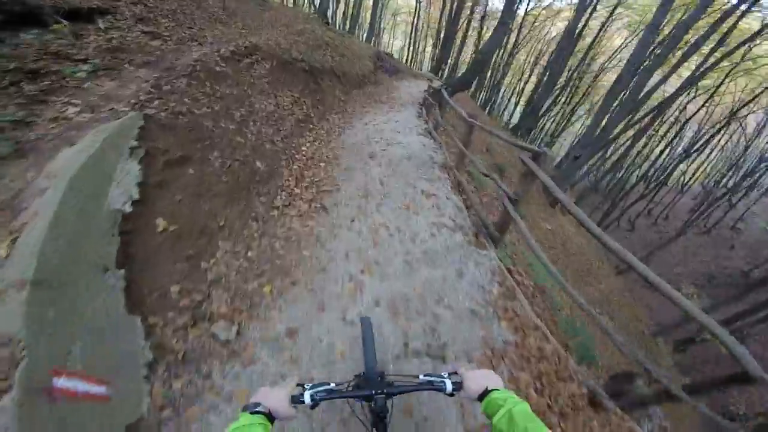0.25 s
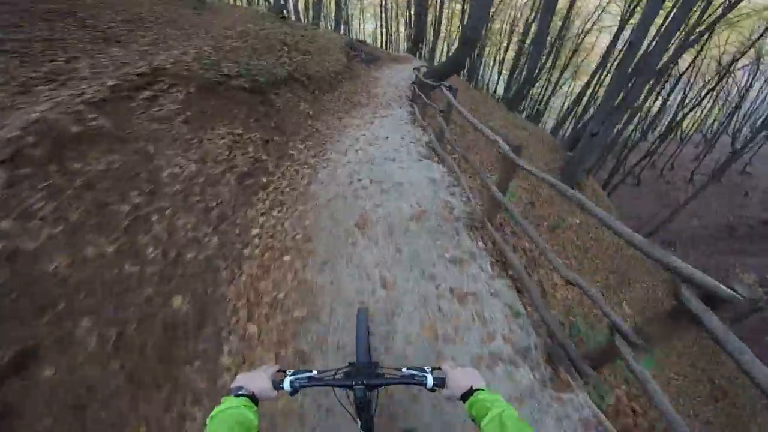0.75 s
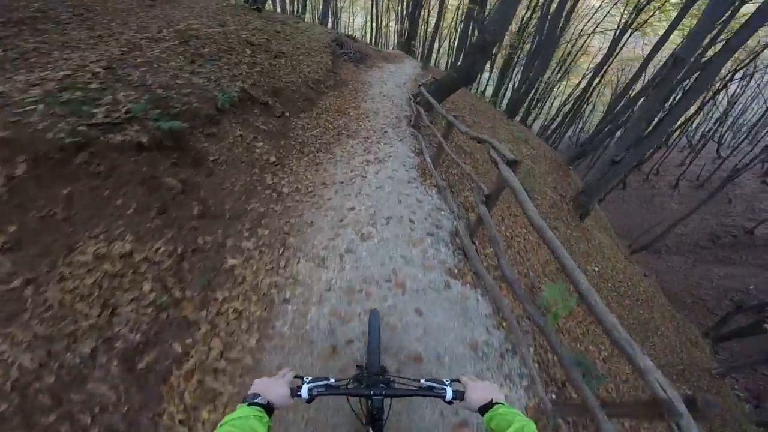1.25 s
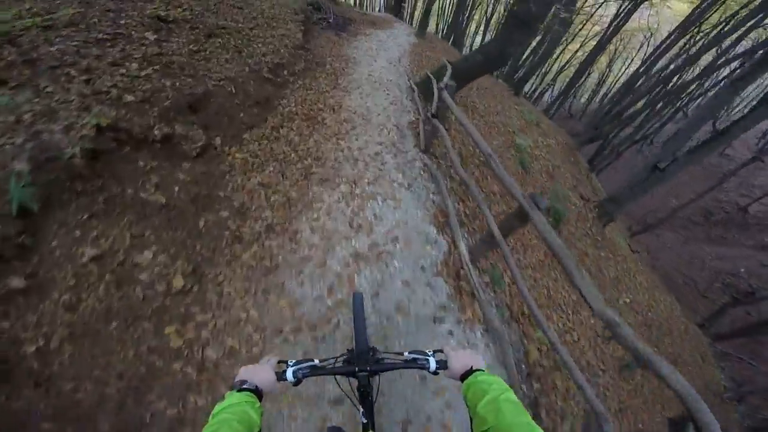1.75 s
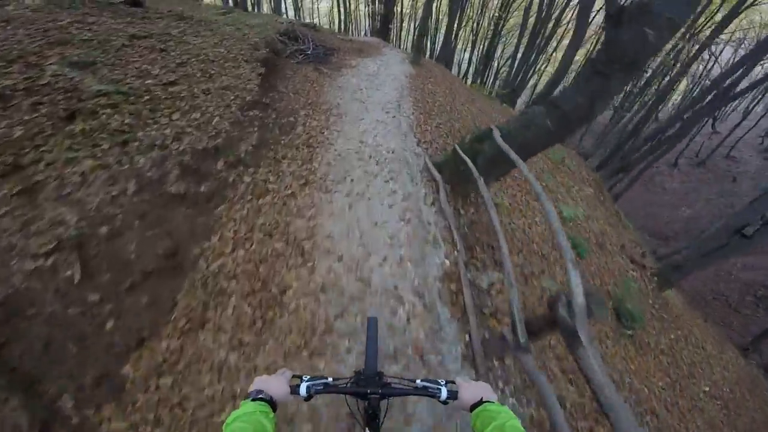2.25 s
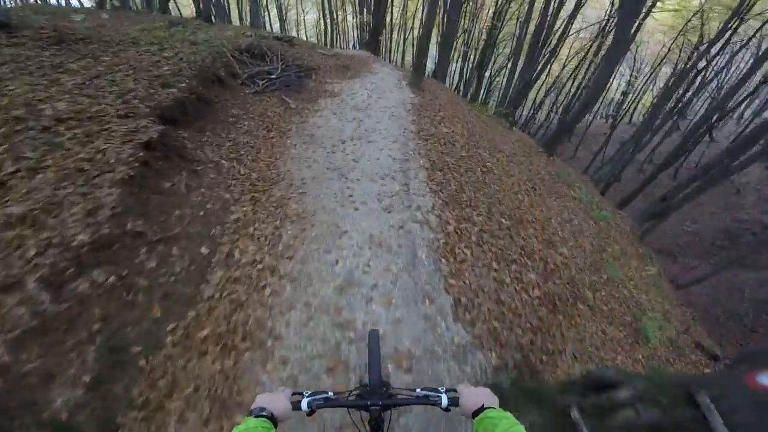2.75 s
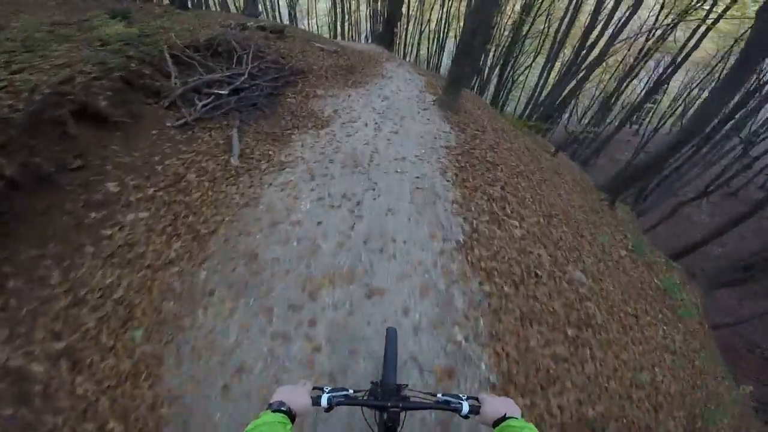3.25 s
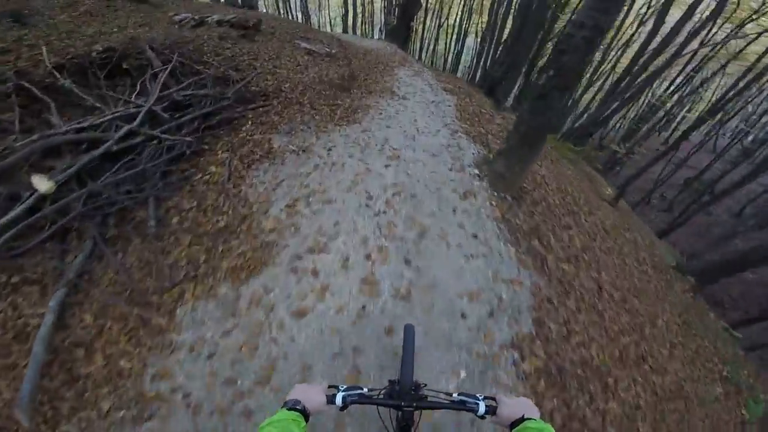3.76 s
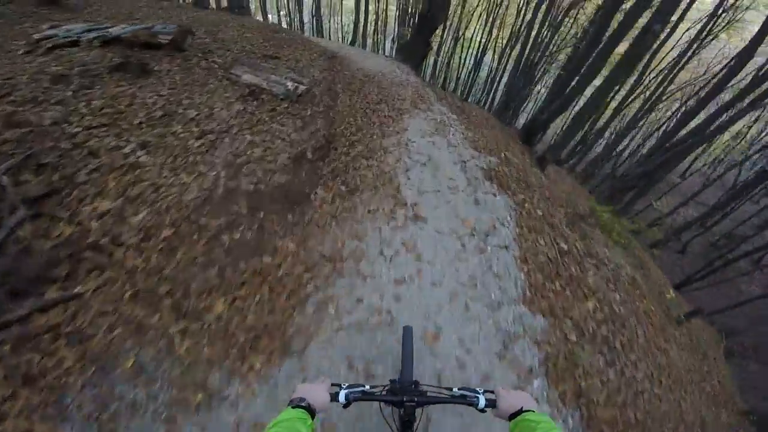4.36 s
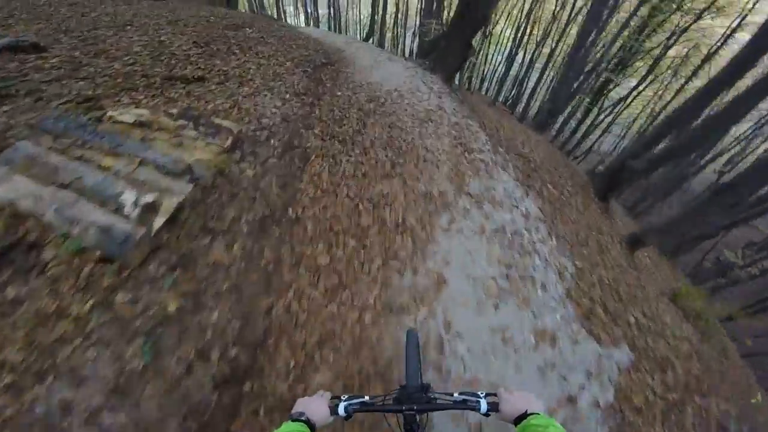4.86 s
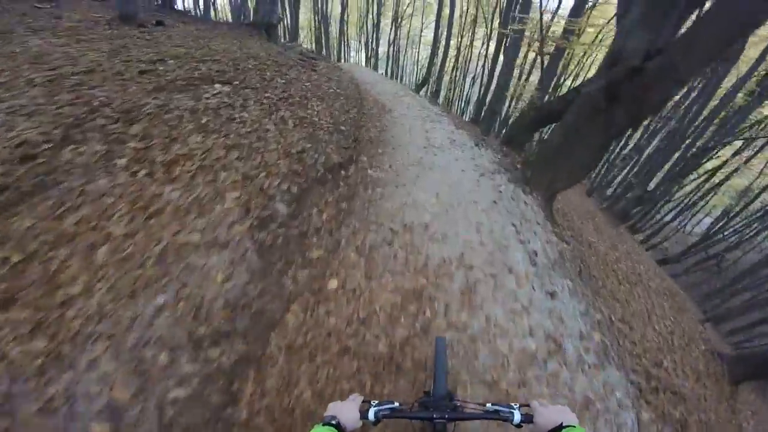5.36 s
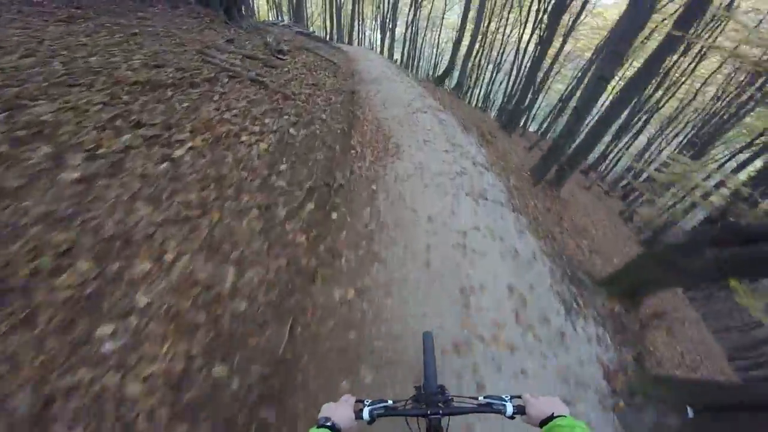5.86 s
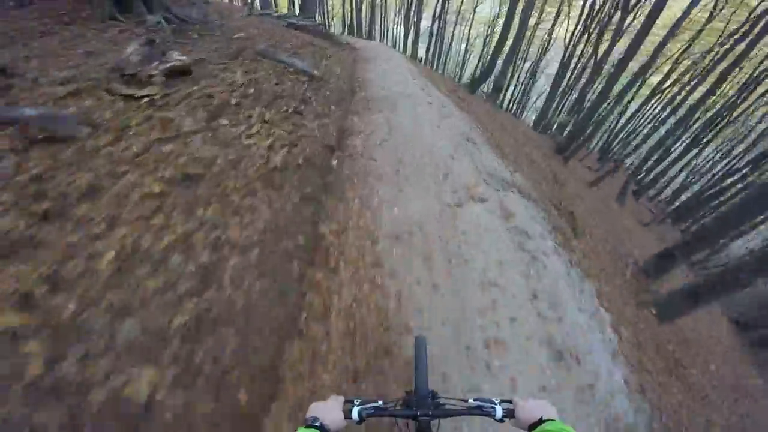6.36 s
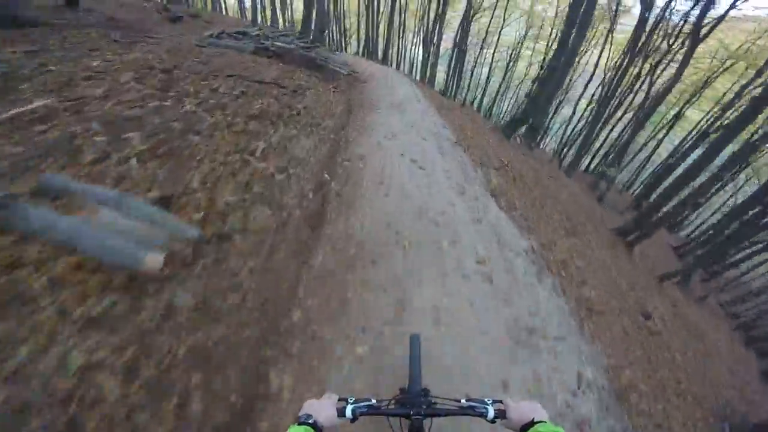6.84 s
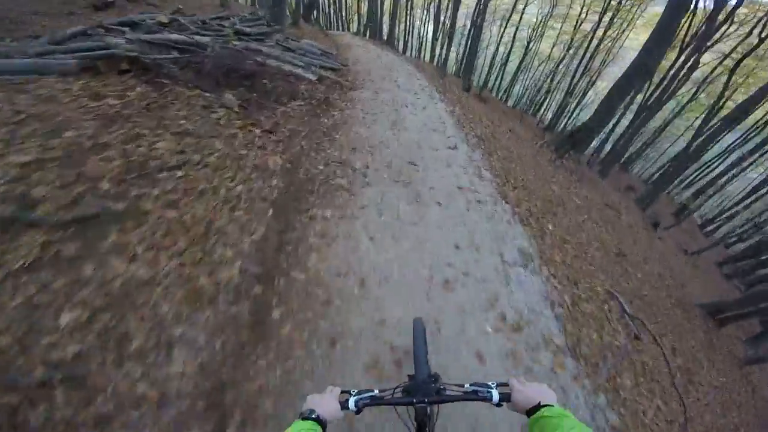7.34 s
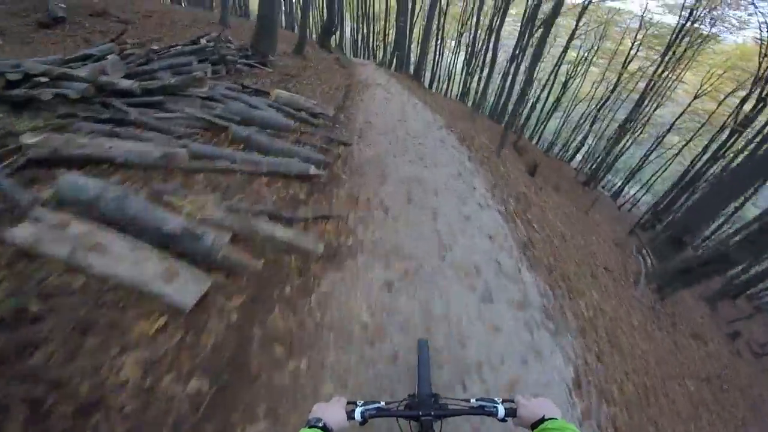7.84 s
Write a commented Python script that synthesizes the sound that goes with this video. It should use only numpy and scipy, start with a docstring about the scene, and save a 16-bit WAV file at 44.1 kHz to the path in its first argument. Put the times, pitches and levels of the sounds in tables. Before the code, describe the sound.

Close, from the rider's position, bicycle tyres crunch steadily over gravel and scattered dry leaves on a woodland path. Pebbles click and snap at irregular moments and the bike gives short rattles on bumps. The crunching grows louder and denser, then swells into a brief hiss of deep leaves. Wind rumbles against the microphone in ever stronger gusts, dominating the last seconds with low thumps while the tyres keep crackling.

```python
"""Mountain bike on a forest trail

Camera microphone on the rider's chest, about a metre above the tyres, as the bike gathers speed.
The tyres grind over grit, crush dry leaves and flick small stones; around 5 s they run through a leaf
drift. Bumps rattle the frame. Wind buffets the microphone ever harder, and the camera's case colours
the crackle."""
import sys
import numpy as np
from scipy import signal
from scipy.fft import rfft, irfft
from scipy.io import wavfile
from scipy.ndimage import map_coordinates

SR = 44100
rng = np.random.default_rng(int(sys.argv[2]) if len(sys.argv) > 2 else 0)


def digitize_waveform(pressure):
    """Quantize a signal to 16-bit integers and store it at the path in sys.argv[1].

    Rows of a 2-D input are taken as channels; values are limited to [-1, 1].
    """
    field = np.atleast_2d(pressure).T
    bounded = np.clip(field, -1, 1)
    quanta = np.round(bounded * 32767).astype(np.int16)
    wavfile.write(sys.argv[1], SR, quanta)


N = 357210

# gravel under the tyres along the trail: t/s, level/dB
GRAVEL = [(0.0, -50), (1.0, -47), (1.8, -45), (2.8, -43), (3.1, -39), (3.35, -38.5), (3.63, -36.5),
          (3.92, -40), (4.3, -43), (4.72, -36), (5.0, -36.5), (5.35, -34), (5.88, -43.5), (6.55, -38.5),
          (7.1, -42.5), (8.1, -40)]
# spectra of the drumming tread, the grinding grit and small eddies of air: f/Hz, level/dB
TREAD_SPECTRUM = [(30, -41), (150, -6.5), (240, -7), (315, 14), (400, -8), (520, 6), (590, 1), (668, -3.5),
                  (780, 5), (1000, -7.5), (1600, -29.5), (8000, -100)]
GRIT_SPECTRUM = [(60, -55), (300, -16), (700, -0.5), (1000, -2), (1400, 1), (2000, 4.5), (2900, -3),
                 (3700, -7), (5000, -22.5), (8000, -29.5), (12000, -34.5), (16000, -56)]
EDDY_SPECTRUM = [(70, -22.5), (150, -1), (220, -0.5), (320, -4), (450, -8.5), (650, -16), (800, -24.5),
                 (1000, -31.5), (1600, -40.5), (4000, -96), (10000, -120)]
MERGE_DB_PER_S = 1  # small patches and stones sink into the rush as the bike speeds up


def rolling():
    """The tread drums on the ground and grinds the trail: more contacts are both louder and denser."""
    # the tyres go light behind a rise in the path: t/s, length/s, loss/dB
    lifts = [(0.35, .08, 1), (0.52, 0.057, 2.5), (1.22, 0.11, 3.5), (1.49, 0.065, 6), (3.325, 0.07, 7.5),
             (3.735, 0.036, 6), (3.89, 0.17, 2), (4.2, 0.091, 1.5), (7.225, 0.15, 3.5), (8.08, 0.17, 2.5)]
    # spectra of rustling leaves and of their finest fragments: f/Hz, level/dB
    leaf_spectrum = [(200, -59), (1000, -15), (2500, -0.5), (3700, -1), (4800, -1), (5800, -3), (7000, -4),
                     (8500, -8.5), (10000, -15), (12500, -25), (14500, -28.5), (16000, -42)]
    sizzle_spectrum = [(2000, -25), (6000, 3), (9500, -4), (12500, -7), (15000, -13)]
    t = np.arange(N) / SR
    lift_db, drift_db = humps(lifts), leaf_drifts()
    grit_db = curve(GRAVEL) - lift_db
    leaves_db = leaf_litter(t) + drift_db - lift_db / 2
    uneven = amp(-0.12 * (t - 3.0) - 0.3 * drift_db)  # the roll evens out with speed and in deep leaves
    bumps = uneven * wobble(40)  # both tyres press harder on every bump
    cushion_db = 0.22 * drift_db
    tread = noise(TREAD_SPECTRUM) * amp(-44.5 + 0.93 * (grit_db + 43.5) - cushion_db + 0.56 * bumps)
    grit = crackle(GRIT_SPECTRUM, 800 * amp(grit_db + 43.5) / uneven ** 2, spread_db=8.0, blur=0.75)
    grit *= amp(grit_db - 2.0 + 1.6 * bumps)
    leaves = crackle(leaf_spectrum, 1700 * amp(leaves_db + 55.5), spread_db=0.5, blur=1.0)
    patchy = amp(-0.45 * (leaves_db + 48))  # a deep drift evens out the rustle of single leaves
    flutter_db = 0.35 * bumps + 2.65 * np.minimum(uneven, 1) * wobble(90)
    leaves *= amp(leaves_db - 3.5 + patchy * flutter_db)
    # pebbles and stalks keep nearly the same size, so they sink into the rush as it grows
    pebbles = ticks(2360, octaves=0.48, size_db=6, count=1000)
    pebbles *= amp(-50.5 + 0.68 * (grit_db + 36.5) + 2.5 * bumps)
    stalks = ticks(5230, octaves=0.8, size_db=18, count=900) * amp(-62.5 + (leaves_db + 49) / 2)
    # brittle leaf edges break one by one, each at its own high pitch
    flakes = ticks(7600, octaves=0.6, size_db=22, count=800) * amp(-65.5 + 0.53 * (leaves_db + 48))
    sizzle = amp(-68.5) * noise(sizzle_spectrum)
    return tread + grit + pebbles + leaves + stalks + flakes + sizzle


def leaf_litter(t):
    """Level in dB of scattered leaves, which rustle louder as the bike gains speed."""
    return -58 + 0.73 * t


def leaf_drifts(edge_share=0.17):
    """The dB that drifts add to the scattered leaves; each deepens, holds and thins out."""
    # drifts that the tyres plough through: t in/s, t out/s, gain/dB
    drift_spans = [(1.712, 3.758, 3.5), (4.714, 4.832, 10), (4.929, 5.79, 15), (6.403, 6.84, 6),
                   (7.82, 7.986, 7)]
    t = np.arange(N) / SR
    drift_db = np.zeros(N)
    for enter, leave, db in drift_spans:
        edge_s = edge_share * (leave - enter)
        drift_db += db * (np.tanh((t - enter) / edge_s) - np.tanh((t - leave) / edge_s)) / 2
    return drift_db


def crunches(rise_share=0.18):
    """A patch of grit and leaves gives way quickly and crumbles out, with a dull bump from the tyre."""
    # the biggest patches crushed at once: t/s, length/s, grit level/dB, leaf level/dB
    big_patches = [(0.1, 0.038, -52, -63), (0.399, 0.014, -37.5, -60), (0.451, 0.012, -40.5, -62),
                   (.49, 0.0097, -47, -69), (0.66, 0.041, -43, -58), (0.747, 0.021, -49, -54),
                   (0.778, 0.027, -39.5, -69), (0.983, 0.018, -41, -55), (1.087, 0.029, -44, -59),
                   (1.362, 0.016, -45, -60), (1.475, 0.0072, -50, -60), (1.548, 0.018, -38, -76),
                   (1.717, 0.014, -43, -58), (1.74, 0.014, -54, -52), (1.78, 0.029, -53, -55),
                   (1.823, 0.02, -37.5, -53), (1.878, 0.018, -42, -55), (2.061, 0.025, -38, -49.5),
                   (2.13, 0.015, -36, -50), (2.177, 0.032, -42, -53.5), (2.26, 0.0065, -40, -43.5),
                   (2.313, 0.024, -36.5, -49.5), (2.354, 0.022, -39, -52.5), (2.421, 0.022, -38, -49.5),
                   (2.525, 0.049, -47, -58), (2.569, 0.0085, -33.5, -53), (2.71, 0.022, -35, -57),
                   (2.758, .016, -38, -68), (2.793, .012, -36, -68), (2.87, 0.011, -36, -55),
                   (2.956, 0.016, -38, -58), (2.996, 0.024, -34.5, -68), (3.042, 0.028, -43, -49.5),
                   (3.099, 0.027, -37, -61), (3.125, 0.014, -36, -51), (3.151, 0.01, -33, -53),
                   (3.263, 0.013, -36, -62), (3.291, 0.02, -38, -59), (3.403, 0.025, -36, -52.5),
                   (3.452, 0.024, -31.5, -51.5), (3.548, 0.028, -37, -61), (3.667, .014, -50, -54),
                   (3.693, .016, -40, -57), (3.78, 0.033, -33.5, -55), (3.84, 0.02, -36, -52),
                   (3.985, 0.049, -42, -64), (4.064, 0.016, -42, -48.5), (4.09, 0.028, -34, -69),
                   (4.283, 0.065, -41, -56), (4.396, 0.014, -39, -52), (4.517, 0.014, -33.5, -56),
                   (4.809, 0.027, -37, -49.5), (4.912, .008, -43, -49), (4.93, 0.012, -32.5, -51),
                   (4.956, 0.012, -49, -57), (5.022, 0.017, -50, -47.5), (5.065, 0.013, -45, -44.5),
                   (5.183, 0.058, -60, -47.5), (5.554, .014, -36, -47), (5.613, .04, -43, -48),
                   (5.646, 0.013, -40, -47), (6.469, 0.025, -35, -47.5), (6.503, 0.019, -31, -45.5),
                   (6.535, 0.0087, -35.5, -46), (6.67, 0.018, -50, -51.5), (7.067, 0.01, -44, -57.5),
                   (7.161, 0.01, -33.5, -62), (7.45, 0.015, -45.5, -58)]
    # spectrum of crushed leaves: f/Hz, level/dB
    crush_spectrum = [(200, -56), (1000, -15), (2500, -6), (3700, -2), (4800, 0.5), (5800, -2),
                      (7000, -2.5), (8500, -6), (10000, -14), (12500, -23), (14500, -29), (16000, -38)]
    t = np.arange(N) / SR
    grit_power, leaf_power = np.zeros(N), np.zeros(N)
    for s, length, grit_db, leaves_db in big_patches + small_patches():
        near = slice(max(int((s - 0.1) * SR), 0), int((s + 0.15) * SR))
        age = np.maximum((t[near] - s) / (length * rise_share) + 2.5, 0) / 2
        grit_power[near] += amp(grit_db) ** 2 * swell(age)
        leaf_power[near] += amp(leaves_db) ** 2 * swell(age)
    grit = amp(-3.0) * crackle(GRIT_SPECTRUM, 1500, spread_db=4.5, blur=0.6)
    bump = amp(-5.5) * noise(TREAD_SPECTRUM)
    pebbles = amp(-3.0) * ticks(2155, octaves=0.59, size_db=6.5, count=5000)
    leaves = amp(6.5) * crackle(crush_spectrum, 2500, spread_db=8.5, blur=0.44)
    return np.sqrt(grit_power) * (grit + bump + pebbles) + np.sqrt(leaf_power) * leaves


def small_patches(count=60, length_s=0.0097, spread_db=1):
    """Random rows for crunches(), as strong as the trail is gritty and leafy there."""
    s = scattered_times(count)
    grit_offset, leaf_offset = spread_db * rng.standard_normal((count, 2)).T - MERGE_DB_PER_S * s
    grit_db = np.interp(s, *np.transpose(GRAVEL)) + 5.5 + grit_offset
    leaves_db = leaf_litter(s) - 5.5 + leaf_offset
    return list(zip(s, np.full(count, length_s), grit_db, leaves_db))


def stones(crack_hz=5200, knock_hz=884, scatter_t60=0.086):
    """A pinched stone cracks free with a pop of a few cycles, knocks the tyre and scatters some grit."""
    # the loudest stones: t/s, snap level/dB, snap f/Hz, knock level/dB
    big_stones = [(0.095, -35, 2720, -38), (0.0973, -23.5, 2500, -40), (0.1155, -26, 2840, -29),
                  (0.1641, -26, 2600, -38), (0.1924, -31.5, 5020, -50), (0.2385, -46, 2050, -34),
                  (0.4036, -28, 2890, -43), (0.4462, -32, 1700, -32), (0.4508, -33, 2400, -40),
                  (0.7135, -26.5, 2150, -40), (0.7974, -25, 2600, -37), (0.9784, -19.5, 2100, -28),
                  (1.03, -29, 1740, -28), (1.1228, -23, 2700, -35), (1.161, -29.5, 2880, -48),
                  (1.273, -36, 2040, -40), (1.326, -24, 1760, -34), (1.3785, -31, 2780, -43),
                  (1.4035, -26, 2450, -40), (1.4316, -32, 2430, -44), (1.4503, -30, 1900, -45),
                  (1.5045, -28, 2780, -40), (1.538, -33, 2240, -47), (1.557, -26, 1900, -42),
                  (1.653, -23, 2480, -27), (1.7066, -31, 4170, -45), (1.7085, -29.5, 4600, -48),
                  (1.7447, -36, 4830, -50), (1.786, -33, 2260, -42), (1.8272, -29, 4520, -45),
                  (1.888, -16, 2130, -21), (1.9355, -25, 2050, -37), (1.965, -30, 1780, -34),
                  (2.0086, -25.5, 1580, -26), (2.1791, -18, 1860, -26), (2.611, -19.5, 2160, -36),
                  (2.7091, -18, 2000, -27), (2.8714, -18, 1990, -25), (3.044, -16.5, 2200, -28),
                  (3.2115, -21, 1910, -37), (3.4076, -14, 1900, -30), (3.4605, -23, 1900, -19),
                  (3.5112, -24, 1900, -21), (3.577, -26, 1700, -21), (3.6275, -22, 1850, -29),
                  (3.6325, -23, 2300, -28), (3.7852, -17.5, 2110, -32), (3.8010, -17, 1810, -15),
                  (4.013, -20, 2230, -27), (4.089, -20, 2200, -25), (4.1035, -22, 1800, -30),
                  (4.144, -24, 2130, -33), (4.272, -19.5, 2060, -22), (4.4342, -11, 2130, -29),
                  (4.6358, -14, 2150, -25), (4.935, -18.5, 1860, -27), (4.985, -22.5, 2400, -34),
                  (5.06, -17.5, 2080, -30), (5.404, -21, 1900, -21), (5.428, -25, 2290, -34),
                  (5.7595, -24, 1880, -30), (5.974, -25.5, 2720, -37), (6.253, -24.5, 1800, -24),
                  (6.298, -27, 1800, -23), (6.4592, -19, 1790, -26), (6.658, -27, 1910, -24),
                  (7.267, -30, 2000, -28), (7.3355, -17.5, 2640, -32), (7.467, -19, 2130, -21)]
    t = np.arange(SR // 20) / SR
    pops, scatter = np.zeros(N), np.zeros(N)
    for s, db, hz, knock_db in big_stones + small_stones():
        ring, hollow, brittle = rng.standard_normal(3)
        snap = amp(db + 1.8) * pop(t, hz, rise_cycles=0.86 * np.exp(0.18 * ring))
        crack_db = -37 + 0.28 * (db + 15.5) + 3 * brittle
        crack = amp(crack_db) * pop(t, crack_hz, rise_cycles=0.56)
        knock = amp(knock_db) * pop(t, knock_hz * 2 ** (0.28 * hollow), rise_cycles=0.53)
        add_at(pops, s, crack + snap + knock)
        add_at(scatter, s, amp(db - 26 - 60 * t / scatter_t60))
    return pops + scatter * noise(GRIT_SPECTRUM)


def small_stones(count=32, spread_db=2, centre_hz=2160, octaves=0.32, knock_db=-9):
    """Random rows for stones(), stronger where the trail is grittier."""
    s = scattered_times(count)
    size, pitch = rng.standard_normal((count, 2)).T
    db = np.interp(s, *np.transpose(GRAVEL)) + 16.5 + spread_db * size - MERGE_DB_PER_S * s
    return list(zip(s, db, centre_hz * 2 ** (octaves * pitch), db + knock_db))


def frame_rattle(chatter_s=0.0143, contacts=4, rise_s=0.00027):
    """Each bump shakes loose parts into a few quick, ever weaker contacts, which ring the frame."""
    # bumps that rattle the bike: t/s, level/dB
    jolts = [(0.1, -46), (0.449, -50), (1.12, -39), (1.155, -44), (1.283, -40.5), (1.888, -41.5),
             (2.1, -37), (2.527, -40.5), (3.043, -38), (3.171, -32.5), (3.406, -30.5), (3.449, -32),
             (3.547, -41), (3.8, -30), (4.014, -33), (4.082, -34), (4.1, -34), (6.459, -27.5), (6.657, -35)]
    # modes of the frame: f/Hz, level/dB, t60/s
    frame_modes = [(312, 3, 0.14), (510, 0.5, 0.034), (665, 3, 0.17), (836, -2, 0.05), (1053, -4.5, 0.069),
                   (1226, -2, 0.081), (1410, 1.5, 0.048), (1837, 4.5, 0.031)]
    t = np.arange(SR // 8) / SR
    hz, mode_db, t60 = np.transpose(frame_modes)[:, :, None]
    attack = 1 - np.exp(-t / rise_s)
    rattle = np.zeros(N)
    for s, db in jolts:
        for k in range(contacts):
            delay = chatter_s * (k + 0.865 * rng.random() * (k > 0)) / contacts
            decays = amp(mode_db + 4.7 * rng.standard_normal(hz.shape) - 60 * t / t60)
            modes = decays * np.sin(2 * np.pi * (hz * t + rng.random(hz.shape)))
            add_at(rattle, s + delay, amp(db - 4 - 16 * k) * modes.sum(0) * attack)
    return rattle


def wind(breeze_db=-23):
    """Large eddies shove the microphone; small ones tear past in quick flurries and roar at speed."""
    # airflow at the microphone between gusts, rising with the bike's speed: t/s, level/dB
    airflow = [(0.0, -51), (0.33, -41), (1.2, -36.5), (2.02, -37), (2.22, -28), (2.75, -23.5),
               (3.45, -24.5), (4.22, -28.5), (4.45, -20.5), (4.93, -25.5), (5.85, -23), (6.05, -15.5),
               (6.55, -15), (6.78, -16.5), (7.3, -15.5), (7.52, -19.5), (7.92, -12.5), (8.1, -15)]
    # gusts on top of it, and a few lulls: crest t/s, length/s, gain/dB
    gusts = [(0.676, 0.1, 7.5), (1.327, 0.11, 9.5), (1.7, 0.18, 5), (2.25, 0.088, 7.5), (2.35, 0.051, 2.5),
             (2.46, 0.21, 3.5), (2.65, 0.32, 1.5), (2.78, .06, -3), (2.925, 0.18, 6.5), (3.06, 0.21, 5),
             (3.15, 0.064, 1.5), (3.58, 0.22, 5.5), (4.06, 0.13, 9.5), (4.71, 0.38, 7), (4.78, 0.06, 3.5),
             (5.058, 0.11, 6), (5.274, 0.26, 5.5), (5.505, 0.22, 9), (5.714, 0.26, 4.5), (5.9, .07, -0.5),
             (5.99, 0.064, 4), (6.08, 0.055, -1.5), (6.49, 0.086, 1.5), (6.72, 0.13, -4), (6.97, 0.1, 2),
             (7.07, 0.066, -1.5), (7.165, 0.14, 4), (7.295, .07, 3), (7.395, 0.071, 7), (7.52, 0.044, -5),
             (7.59, 0.073, 3.5), (7.7, 0.071, -5), (7.99, 0.12, 4)]
    # spectra of the largest and the finest eddies: f/Hz, level/dB
    buffet_spectrum = [(8, -13.5), (20, -2), (45, -1), (70, -2), (105, -5.5), (160, -11), (250, -24.5),
                       (500, -42), (1000, -91), (3000, -120)]
    roar_spectrum = [(150, -33.5), (350, -6.5), (520, 4.5), (760, -1.5), (950, -14.5), (1400, -31.5),
                     (4000, -86.5)]
    airflow_db, gust_db = curve(airflow), humps(gusts)
    over_breeze_db = airflow_db - breeze_db
    buffet_db = 1.2 + airflow_db + gust_db + 1.6 * wobble(22)
    rush_db = -31 + over_breeze_db + 0.66 * gust_db + 0.67 * wobble(22)
    flurry = wobble(70)
    roar_db = -49 + 1.52 * over_breeze_db + 0.3 * gust_db + 0.72 * flurry
    buffet = unit(noise(buffet_spectrum) * amp(0.8 * flurry))
    rush = unit(noise(EDDY_SPECTRUM) * amp(0.63 * flurry + 2.3 * wobble(180)))
    return amp(buffet_db) * buffet + amp(rush_db) * rush + amp(roar_db) * noise(roar_spectrum)


def wind_slaps(puff_rise_s=0.0042, puff_t60=0.061):
    """An eddy right at the microphone gives one low push and a short puff."""
    # single eddies: t/s, level/dB, push f/Hz, relative puff level/dB
    close_eddies = [(1.293, -25, 71, -16), (2.177, -10, 77, -17), (2.407, -8, 70, -30),
                    (2.529, -4, 190, -12), (2.816, -8, 84, -9), (2.908, -9, 90, -21),
                    (2.933, -13, 171, -16), (3.038, -2.5, 72, -12), (3.908, -6, 63.6, -35),
                    (4.037, -9.5, 71.6, -26), (4.632, -3, 125, -34), (5.768, -3.5, 125, -12),
                    (6.792, -4.5, 109, -21), (6.916, -1, 125, -12), (6.961, 4.5, 160, -14),
                    (7.01, 3, 120, -19), (7.181, 0, 105, -16), (7.995, 3.5, 122, -13)]
    t = np.arange(SR // 8) / SR
    attack = 1 - np.exp(-t / puff_rise_s)
    push, puff = np.zeros(N), np.zeros(N)
    for s, db, push_hz, puff_db in close_eddies:
        add_at(push, s, amp(db - 5.5) * pop(t, push_hz, rise_cycles=0.43))
        add_at(puff, s, amp(db + puff_db - 60 * t / puff_t60) * attack)
    return push + puff * noise(EDDY_SPECTRUM)


def camera_case(x):
    """Sound from outside picks up the case's resonances on its way to the microphone."""
    # resonances and one dip: f/Hz, width/Hz, gain/dB
    resonances = [(653.5, 56, 10), (1222, 146, 6), (1790, 290, 1.5), (2950, 590, 4.5), (4320, 200, 5),
                  (4960, 790, 8), (5880, 360, -2.5), (6390, 930, 3.5), (8350, 390, 3)]

    def gain_db(hz):
        return sum(db / (1 + (2 * (hz - centre) / width) ** 2) for centre, width, db in resonances) - 2
    return filtered(x, gain_db)


def crackle(spectrum, per_second, spread_db, blur):
    """Tiny fractures of uneven size at random moments, over a blur of countless smaller ones."""
    chance = np.clip(per_second / SR, 1e-5, 1)
    sizes = amp(spread_db * np.minimum(rng.standard_normal(N), 2)) * rng.choice([-1, 1], N)
    grains = unit((rng.random(N) < chance) * sizes / np.sqrt(chance))
    return coloured(grains + blur * rng.standard_normal(N), spectrum)


def ticks(centre_hz, octaves, size_db, count):
    """Many small pops of rms 1 together, each with its own moment, pitch and size."""
    t = np.arange(SR // 200) / SR
    when, pitch, size, ring = rng.random((count, 4)).T[:, :, None]
    hz = centre_hz * 2 ** (octaves * (2 * pitch - 1))
    waves = amp(size_db * size ** 2) * pop(t, hz, rise_cycles=0.5 + ring)
    where = (when * N).astype(int) + np.arange(len(t))
    return unit(np.bincount(where.ravel(), waves.ravel(), N)[:N])


def pop(t, hz, rise_cycles):
    """A wavelet that swells for rise_cycles and dies about as fast."""
    return swell(t * hz / rise_cycles) * np.sin(2 * np.pi * hz * t)


def swell(age):
    """An envelope that rises to 1 at age 1 and dies away."""
    return age ** 2 * np.exp(2 * (1 - age))


def noise(spectrum):
    """Smooth noise of rms 1."""
    return coloured(rng.standard_normal(N), spectrum)


def coloured(x, spectrum):
    """x shaped by (f/Hz, level/dB) points on a log axis, at rms 1."""
    f, level = np.transpose(spectrum)
    return unit(filtered(x, lambda hz: np.interp(np.log(hz + 1), np.log(f), level)))


def filtered(x, gain_db, size=16384):
    """x through the minimum-phase filter whose dB gain is a function of frequency."""
    cepstrum = irfft(np.log(amp(gain_db(np.fft.rfftfreq(size, 1 / SR)))))
    cepstrum[1:size // 2] *= 2
    cepstrum[size // 2 + 1:] = 0
    return signal.fftconvolve(x, irfft(np.exp(rfft(cepstrum))))[:N]


def curve(rows):
    """One value per sample along (t/s, value) points."""
    return np.interp(np.arange(N) / SR, *np.transpose(rows))


def humps(rows):
    """Smooth humps in dB from (crest t/s, length/s, height/dB) rows."""
    t = np.arange(N) / SR
    return sum(db * np.cos(np.pi * np.clip((t - s) / length, -0.5, 0.5)) for s, length, db in rows)


def wobble(rate):
    """A smooth random curve, rate knots a second."""
    return map_coordinates(rng.standard_normal(int(N * rate / SR) + 4), [np.arange(N) * rate / SR])


def scattered_times(count):
    """One random time in seconds in each of count equal stretches of the ride."""
    return (np.arange(count) + rng.random(count)) / count * N / SR


def add_at(track, s, sound):
    """Mix sound into track from s seconds on."""
    span = track[round(s * SR):][:len(sound)]
    span += sound[:len(span)]


def amp(db):
    """Decibels to gain."""
    return 10 ** (np.asarray(db) / 20)


def unit(x):
    """x at rms 1."""
    return x / np.sqrt(np.mean(x ** 2) + 1e-20)


def scene():
    """Tyres and frame from below, wind right on the microphone; mono."""
    tyres = camera_case(rolling() + crunches() + stones())
    return (tyres + frame_rattle() + wind() + wind_slaps())[None]


def record(dry, top_hz=15300, fade_s=0.004):
    """The camera rounds off the strongest gusts and keeps nothing above its band limit."""
    rounded = dry / (1 + np.abs(dry) ** 4) ** (1 / 4)
    fade_out = np.minimum(np.arange(N)[::-1] / (fade_s * SR), 1)
    band_limit = signal.ellip(12, 0.1, 90, top_hz, fs=SR, output="sos")
    return signal.sosfilt(band_limit, rounded * fade_out)


dry = scene()
out = record(dry)
digitize_waveform(out)
```